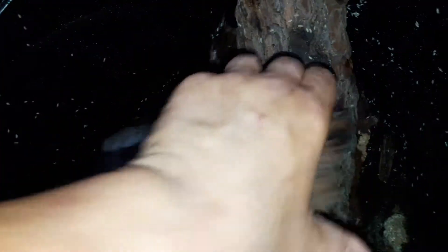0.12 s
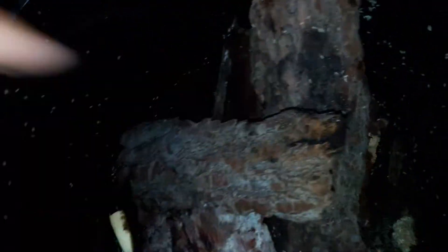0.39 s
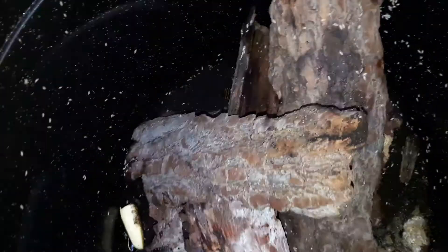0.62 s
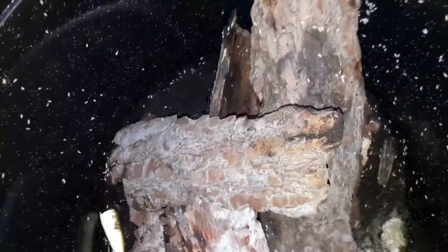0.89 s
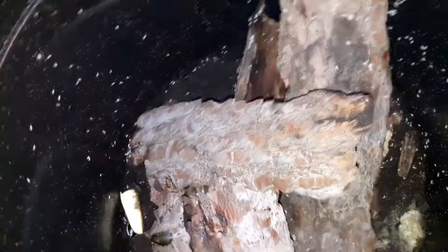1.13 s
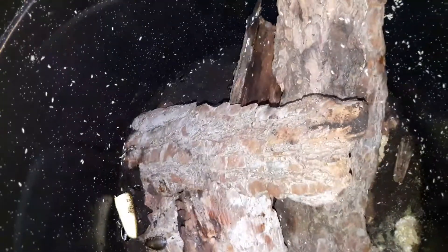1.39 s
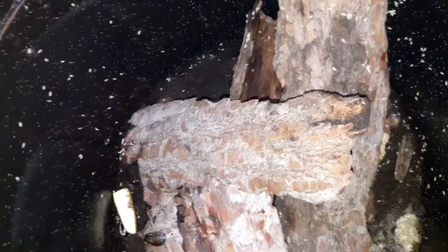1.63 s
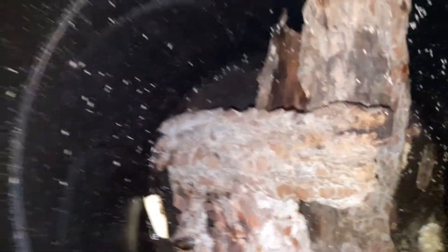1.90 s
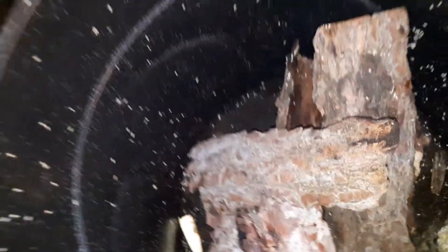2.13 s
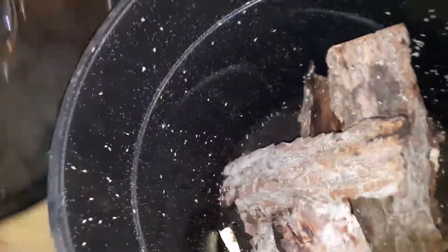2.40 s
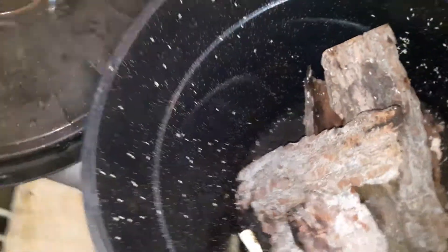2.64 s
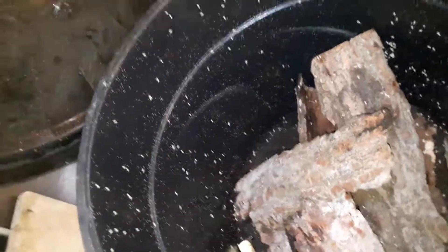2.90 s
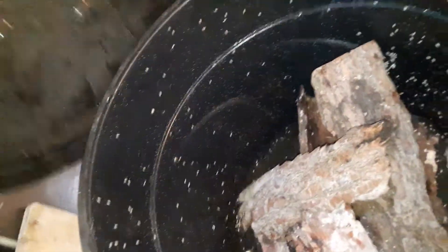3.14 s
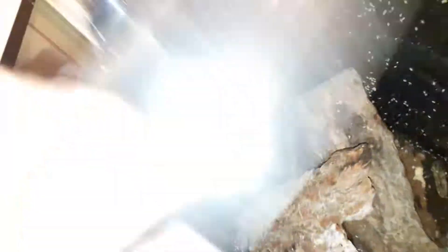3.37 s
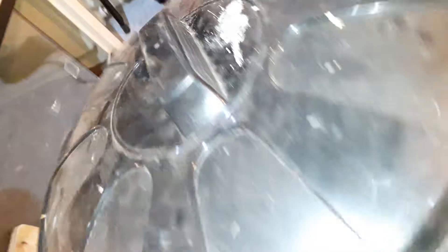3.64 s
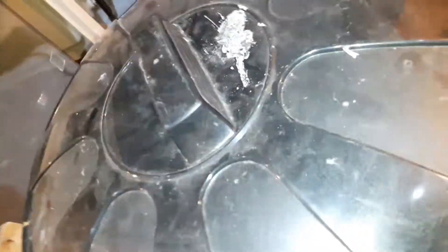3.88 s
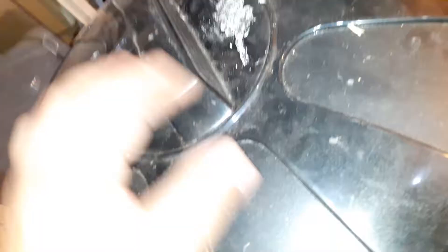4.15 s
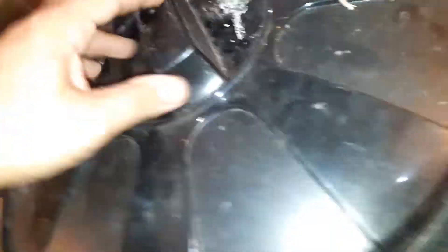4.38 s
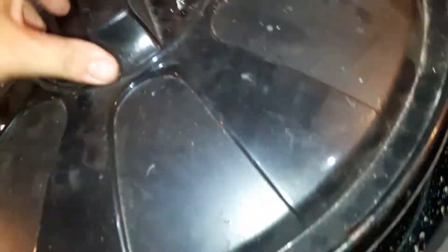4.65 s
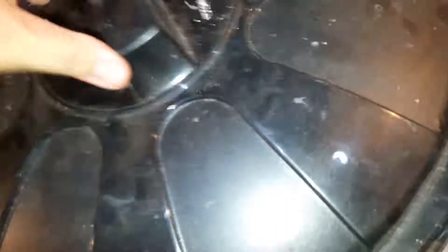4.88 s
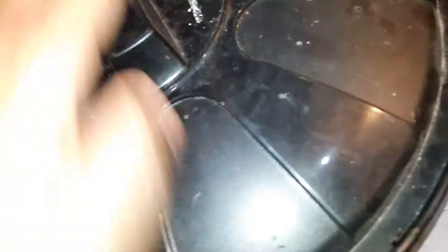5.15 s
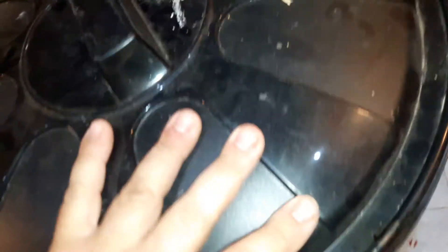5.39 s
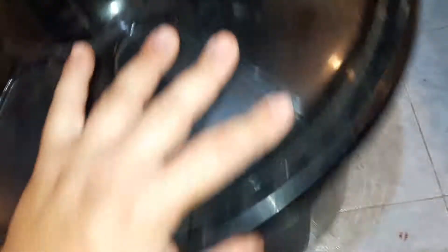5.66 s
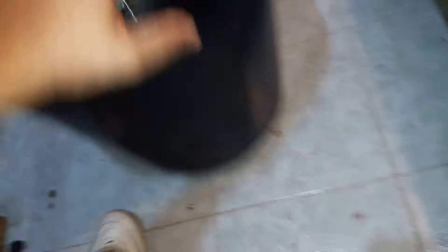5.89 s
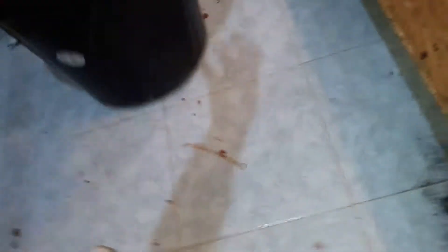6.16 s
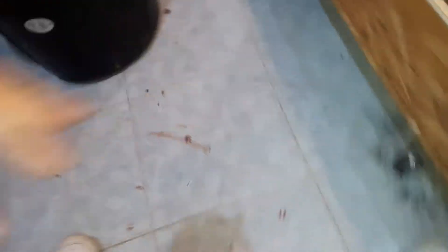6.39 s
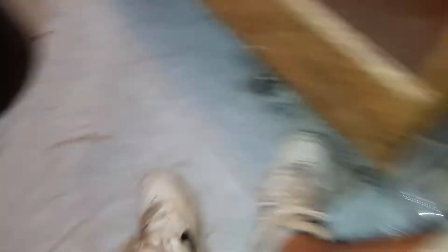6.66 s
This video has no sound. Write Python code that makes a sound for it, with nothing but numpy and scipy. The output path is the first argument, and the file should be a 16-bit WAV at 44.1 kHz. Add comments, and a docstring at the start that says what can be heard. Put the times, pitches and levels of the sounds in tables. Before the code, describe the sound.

A handheld microphone close to a large plastic bin indoors: brief dull bumps and dry crackling of wood, light handling, then a loud hollow knock as the lid goes on. More clacks and low thumps follow as it is seated, with a creaky rub, a last firm slap, and a rough, rattling scrape along the tiled floor. A short room echo follows each hit.

```python
"""Dull knocks, a rub and a dry crackle come first, as a hand leaves firewood in a plastic tub; it drops
the lid on, shifts and presses it home, then shoves the tub away over a tiled floor.
Blows and edge contacts excite damped modes of the tub's air, walls and rim. Friction noise sustains
modes in the strokes, squeaks and slide; random grains make the grit. A small hard room answers with
decaying noise, over a faint room tone."""
import sys
import numpy as np
from scipy import signal
from scipy.fft import rfft, irfft, next_fast_len
from scipy.io import wavfile

SR = 44100
rng = np.random.default_rng(int(sys.argv[2]) if len(sys.argv) > 2 else 0)


def log_audio(samples):
    """Write samples as a 16-bit WAV file to the path given in sys.argv[1]."""
    # one column per channel
    frames = np.atleast_2d(samples).T
    # limit to full scale, then quantise
    limited = np.clip(frames, -1, 1)
    pcm = np.round(limited * 32767).astype(np.int16)
    wavfile.write(sys.argv[1], SR, pcm)


def voltage_ratio(decibels):
    """Convert decibels (scalar or array-like) to amplitude ratios, 20 dB per decade."""
    exponent = np.asarray(decibels, float) / 20
    return 10 ** exponent


N = 298998

# tub modes: the enclosed air and walls boom, the stiff rim clacks
# columns: f/Hz, relative level/dB, T60/s of the free ring
BODY = [(94, 1.5, 0.15), (115, -1, 0.25), (144.2, 3.5, 0.16), (165, -9.5, 0.21), (190.2, 5.5, 0.096),
        (251.7, 6, 0.11), (301.1, 5, 0.099), (350, -2.5, 0.15)]
WALL = [(390, 1, 0.053), (456.5, -1, 0.088), (519, -6, 0.11), (569.4, -3, 0.056), (670, -20.5, 0.12)]
RIM = [(740, -8.5, 0.029), (884, -2, 0.0076), (896, -20.5, 0.058), (1062, -6, 0.042), (1186, -9.5, 0.05),
       (1273, 1.5, 0.021), (1484, 3, 0.016), (1664, -4, 0.015), (1950, 0.5, 0.027), (2390, 5, 0.17)]
# left-right likeness of reflections and broad sources: f/Hz, correlation/1
WIDE_LIKENESS = [(100, 1), (300, 0.93), (700, 0.64), (1500, 0.033), (10000, 0.022)]
LUCK_DB = 1.5   # standard deviation of mode levels from blow to blow
NEAR_PAN_DB = 0.5   # left minus right level of the handling before the ports colour it


def rms_one(x):
    """Normalisation: scales to unit root mean square."""
    return x / np.sqrt(np.mean(x ** 2) + 1e-20)


def in_time(rows):
    """Linear interpolation in time of columns in dB, practically silent before the first row."""
    s, *columns = np.transpose(rows)
    return [np.interp(np.arange(N) / SR, s, c, left=-200) for c in columns]


def at_hz(points, hz):
    """Linear interpolation of a table on a logarithmic frequency axis."""
    f, v = np.transpose(points)
    return np.interp(np.log(np.maximum(hz, 1)), np.log(f), v)


def coloured(x, gain):
    """Linear filtering: multiplies the spectrum by gain(Hz)."""
    size = next_fast_len(x.shape[-1])
    spectrum = rfft(x, size) * gain(np.fft.rfftfreq(size, 1 / SR))
    return irfft(spectrum, size)[..., :x.shape[-1]]


def coarse_and_fine(x, spectrum):
    """Spectral shaping, then a split at 6800 Hz into two parts of unit rms each."""
    x = coloured(x, lambda hz: voltage_ratio(at_hz(spectrum, hz)))
    coarse = coloured(x, lambda hz: hz < 6800)
    return rms_one(coarse), rms_one(x - coarse)


def drift(rate):
    """Slow random fluctuation of unit rms: white noise through two equal low-pass poles at rate/Hz."""
    r = np.exp(-2 * np.pi * rate / SR)
    slow = signal.lfilter([1], [1, -2 * r, r * r], rng.standard_normal(N + SR))
    return rms_one(slow[SR:])   # the filter settles in the first second


def ring(force, hz, t60):
    """Damped resonator: a unit click sets off a decaying sine of initial height 1."""
    r, w = voltage_ratio(-60 / (t60 * SR)), 2 * np.pi * hz / SR
    return signal.lfilter([0, np.sin(w)], [1, -2 * r * np.cos(w), r * r], force + 1e-18)


def dying(clicks, t60):
    """First-order relaxation: each click starts an exponential decay."""
    return signal.lfilter([1], [1, -voltage_ratio(-60 / (t60 * SR))], clicks + 1e-18)


def spikes(seconds, db):
    """Impulse train: one click per event."""
    clicks = np.zeros(N)
    clicks[(seconds * SR).astype(int)] = voltage_ratio(db)
    return clicks


def paired(mid, side, likeness):
    """Interchannel correlation: mixes two unrelated signals to the likeness in the table."""
    alike = lambda hz: np.clip(at_hz(likeness, hz), 0, 1)
    mid = coloured(mid, lambda hz: np.sqrt(1 + alike(hz)))
    side = coloured(side, lambda hz: np.sqrt(1 - alike(hz)))
    return np.array([mid + side, mid - side]) / np.sqrt(2)


def wide_noise(likeness):
    """White noise in stereo with a frequency-dependent correlation."""
    return paired(*rng.standard_normal((2, N)), likeness)


def rubbed(modes, rough_db, rate, favoured=None):
    """Friction excitation: uneven noise keeps modes ringing, most of all near the favoured pitch."""
    force, out = rng.standard_normal(N) * voltage_ratio(rough_db * drift(rate)), 0
    for hz, level_db, t60 in modes:
        # 5 dB lost per octave away from the favoured pitch
        near = 1 if favoured is None else voltage_ratio(-5 * np.abs(np.log2(hz / favoured)))
        # noise builds up more in a long ring; sqrt(t60) evens that out
        out = out + near * voltage_ratio(level_db) * ring(force, hz, t60) / np.sqrt(t60)
    return rms_one(out)


def luck(rows, modes, reach_db):
    """Modal participation in dB: the spot hit favours one mode, others lose reach_db per octave."""
    s, db, favoured = np.transpose(rows)[:3, :, None]
    hz, level_db, t60 = np.transpose(modes)
    loss = reach_db * np.abs(np.log2(hz / favoured))
    return db + level_db - loss + rng.normal(0, LUCK_DB, (len(s), len(hz)))


def placed(x, pan_db, lead_s):
    """Interaural-style cues: the left port hears the source louder by pan and earlier by lead."""
    way = np.array([[.5], [-.5]])
    return voltage_ratio(way * pan_db) * coloured(x, lambda hz: np.exp(2j * np.pi * way * hz * lead_s))


def room_tone():
    """Stationary coloured noise: a faint hush with a slowly wavering level."""
    # spectrum of the hush: f/Hz, relative level/dB per Hz
    hush = [(15, -48), (25, 7), (107, 1), (144, 3), (248, -2.5), (299, -8), (500, -2.5), (620, -9),
            (1010, -6.5), (1150, -8.5), (1510, -6.5), (1680, -7), (2330, -9), (5230, -17.5), (15800, -24)]
    # left-right likeness: f/Hz, correlation/1
    hush_likeness = [(60, 0.91), (240, 0.61), (950, 0.42), (3770, -1.1), (15000, -0.04)]
    air = coloured(wide_noise(hush_likeness), lambda hz: voltage_ratio(at_hz(hush, hz)))
    return voltage_ratio(-61 + 1.0 * drift(3)) * rms_one(air)


def room(x):
    """Diffuse reverberation: each sixth-octave's energy dies away as fresh noise.

    Source and ports keep moving, so reflections never repeat."""
    # reverberation time: f/Hz, T60/s
    room_t60 = [(100, 0.24), (400, 0.3), (1500, 0.27), (5000, 0.24), (14000, 0.31)]
    # reflections against the direct sound: f/Hz, level/dB
    room_level = [(100, -12.5), (300, -6.5), (1000, -3.5), (4000, -2.5), (12000, -7.5)]
    noise = [wide_noise(WIDE_LIKENESS) for _ in "ab"]   # neighbouring bands draw on different noise
    build = np.exp(-1 / (0.0011 * SR))   # reflections build up with a time constant of 1.1 ms
    out = 0
    for k, low in enumerate(70 * 2 ** (np.arange(47) / 6)):
        band = signal.butter(2, [low, low * 2 ** (1 / 6)], "band", fs=SR, output="sos")
        half = at_hz(room_t60, low) / 2   # the square root taken below doubles the decay time
        energy = dying(signal.sosfilt(band, x) ** 2, half) * (1 - voltage_ratio(-60 / (half * SR)))
        energy = signal.lfilter([1 - build], [1, -build], energy)
        tail = np.sqrt(energy) * rms_one(signal.sosfilt(band, noise[k % 2]))
        out = out + voltage_ratio(at_hz(room_level, low)) * tail
    return out


def squeak():
    """Friction-sustained resonance: a slipping finger keeps a single mode singing."""
    # faint squeaks under the sliding hand: start t/s, length/s, level/dB, f/Hz, T60/s
    squeaks = [(3.04, .11, -54, 1190, .05), (3.07, .13, -70, 8700, .012)]
    t, out = np.arange(N) / SR, 0
    for s, length, db, hz, t60 in squeaks:
        swell = np.interp(t, [s, s + length / 2, s + length], [0, 1, 0])
        out = out + voltage_ratio(db) * swell * rubbed([(hz, 0, t60)], 2.5, 30)
    return out


def rubs():
    """Friction: pressing wobbles the body, chafing excites walls and rim, skin hisses."""
    # strokes of hand and lid on the tub: start t/s, length/s,
    # pressure on the walls level/dB, rim chafe level/dB, skin hiss level/dB
    strokes = [(-0.07, 0.12, -51, -37.5, -49.5), (0.167, 0.048, -67, -62, -58.5),
               (0.31, 0.66, -68, -68, -66.5), (1.038, 0.087, -75, -62, -66), (1.414, 0.11, -61, -52.5, -64),
               (1.547, 0.08, -56, -53.5, -82), (1.657, 0.3, -59.5, -68.5, -72),
               (1.92, 0.26, -75, -61.5, -65), (2.12, 1, -90, -72, -61.5), (3.048, 0.074, -48, -51.5, -93),
               (3.197, 0.088, -70, -55, -87), (3.4, 0.13, -52, -55, -66), (3.496, 0.099, -63, -55.5, -53.5),
               (3.57, 0.28, -62, -48, -57), (3.796, 0.22, -40.5, -54, -58.5),
               (3.942, 0.087, -32, -41, -47.5), (4.004, .12, -54, -48.5, -59),
               (4.143, 0.1, -52.5, -68, -64.5), (4.372, 0.16, -48, -47, -50.5),
               (4.601, 0.25, -55, -59, -57), (4.884, 0.27, -40, -42.5, -47), (4.998, 0.096, -19, -59, -47),
               (5.084, 0.13, -18.5, -31, -47), (5.265, 0.14, -56, -60.5, -60),
               (5.374, 0.12, -66, -54.5, -56.5), (5.445, 0.4, -66, -51, -55.5)]
    # spectrum of skin hiss: f/Hz, relative level/dB per Hz
    skin_spectrum = [(880, -19), (1500, -4.5), (2670, -1.5), (2970, -2.5), (5090, -4), (7090, -9.5),
                     (8540, -12), (9510, -15), (11900, -14.5), (15500, -27)]
    rise = 0.26   # share of a stroke spent rising
    t, gains = np.arange(N) / SR, 0
    for s, length, *db in strokes:
        shape = np.interp((t - s) / length, [0, rise, 1], [0, 1, 0]) ** 0.5
        gains = gains + voltage_ratio(np.array(db))[:, None] * shape
    press, chafe, hiss = gains
    favoured = 720 * 2 ** (0.22 * drift(9.9))   # Hz, roaming by 0.22 octave rms
    skin = wide_noise(WIDE_LIKENESS) * voltage_ratio(1.7 * drift(40))
    skin = rms_one(coloured(skin, lambda hz: voltage_ratio(at_hz(skin_spectrum, hz))))
    wobble = press * rubbed(BODY[1:4], 1.3, 19.0)
    return wobble + chafe * rubbed(WALL + RIM, 3.5, 23, favoured) + hiss * skin


def drag():
    """Granular friction: grit is crushed in clumps under the wide base, while the walls rumble along."""
    # tub base sliding on tiles: t/s, grit level/dB, treble level against the grit/dB
    slide = [(5.56, -72, 8), (5.6, -55, 0), (5.63, -41, -5.5), (5.68, -36, -5), (5.95, -26.5, -5.5),
             (6.0, -25.5, -4.5), (6.1, -27, -6.5), (6.14, -27, -2.5), (6.22, -25, -2), (6.32, -27, 0.5),
             (6.41, -29.5, -4), (6.49, -36.5, -11), (6.6, -53.5, -11.5), (6.69, -51.5, -6.5),
             (6.78, -60, -7)]
    # the base catches on tile joints: t/s, base chatter level/dB, jolt of the grit level/dB
    catches = [(5.658, -55, 2.5), (5.989, -37, 2), (6.148, -29.5, 3.5), (6.236, -29, -2.5),
               (6.331, -21.5, -1), (6.417, -49, -1)]
    # base edge modes: f/Hz, relative level/dB, T60/s
    base_modes = [(1950, -1, 0.054), (2330, -8, 0.013), (2510, 4, 0.05), (2692, 9.5, 0.043),
                  (3530, 8.5, 0.0048)]
    # spectrum of the grit: f/Hz, relative level/dB per Hz
    grit_spectrum = [(240, 4.5), (400, -1.5), (561, -4), (799, 0.5), (1070, -2.5), (1170, -1), (1890, -0.5),
                     (2690, -2), (4080, -4.5), (5300, -2), (6470, -5.5), (8030, -12.5), (9960, -14),
                     (11800, -14.5), (15800, -24.5)]
    rumble_db, steady_chatter_db = -5, -11.5   # against the grit
    grains_per_s, grain_spread_db = 5000, 1   # the rate is nominal, as clumping varies it
    chatter_rough_db, catch_t60_s = 4.0, 0.34
    grit_db, treble_db = in_time(slide)
    s, chatter_db, jolt_db = np.transpose(catches)
    jolts = dying(spikes(s, jolt_db) - spikes(s, 0), catch_t60_s)
    coarse = voltage_ratio(grit_db) * (1 + jolts)
    rumble, fine = coarse * voltage_ratio(rumble_db), coarse * voltage_ratio(treble_db)
    chatter = voltage_ratio(grit_db + steady_chatter_db) + dying(spikes(s, chatter_db), catch_t60_s)
    born = rng.random((2, N)) < grains_per_s * voltage_ratio(3.0 * drift(30)) / SR
    sizes = voltage_ratio(grain_spread_db * np.minimum(rng.exponential(1, (2, N)), 5))
    grains = born * sizes * rng.choice([-1, 1], (2, N))
    low, high = coarse_and_fine(paired(*grains, WIDE_LIKENESS), grit_spectrum)
    edge = paired(rubbed(base_modes, chatter_rough_db, 32),
                  rubbed(base_modes, chatter_rough_db, 35), WIDE_LIKENESS)
    return rumble * rubbed(BODY[2:], 3.0, 16) + coarse * low + fine * high + chatter * edge


def taps():
    """Impulse response of the rim: edges clack on it with a noisy crack; bark crumbles in brief puffs."""
    # hard edge contacts: t/s, rim level/dB, favoured mode f/Hz, crack level/dB, fine crack level/dB
    contacts = [(0.171, -49, 1480, -55, -52), (0.258, -25, 725, -53, -62), (0.282, -34.5, 1050, -60, -70),
                (0.308, -27, 740, -57, -70), (0.414, -41, 727, -54.5, -78), (1.05, -43, 860, -72, -66),
                (1.434, -28.5, 740, -59, -73), (1.45, -44, 795, -69, -66), (1.559, -45.5, 1060, -53, -75),
                (1.912, -40, 804, -64, -65), (2.782, -11.5, 1365, -28.5, -55), (2.885, -14, 1180, -27, -44),
                (2.963, -28.5, 1110, -62, -73), (3.009, -41, 1070, -65, -97),
                (3.315, -21.5, 1220, -29.5, -41.5), (3.357, -19.5, 1050, -42.5, -70),
                (3.549, -24, 1015, -33.5, -54), (3.649, -32, 1070, -53, -72), (3.664, -34, 1060, -51, -70),
                (3.769, -23, 1340, -38.5, -70), (3.972, -28.5, 1160, -35, -44), (4.1, -45, 1380, -45, -59),
                (4.633, -53, 1550, -57, -60), (4.908, -38, 755, -48, -70), (4.949, -30.5, 1490, -41, -62),
                (5.009, -25, 1000, -24.5, -40), (5.056, -10.5, 890, -33, -47),
                (5.117, -14, 950, -34.5, -48), (5.137, -23, 740, -50, -45), (5.151, -3.5, 820, -38, -50),
                (5.385, -31, 712, -65, -64), (5.438, -11.5, 795, -33.5, -65),
                (5.485, -37.5, 1080, -60, -65), (5.659, -47, 2020, -32, -31.5), (5.714, -32, 706, -41, -32),
                (6.17, -18, 1950, -20, -41), (6.331, -16, 1950, -14.5, -25), (6.42, -38, 2080, -22, -23)]
    # bark and grit crumble under the log, later under the lid's edge:
    # t/s at the loudest, crack level/dB, fine crack level/dB
    crumbles = [(0.249, -50, -43), (0.259, -33.5, -40), (0.282, -44, -46), (0.31, -50, -64),
                (0.331, -43, -45), (0.352, -65, -43), (3.97, -26.5, -47.5), (5.444, -33, -36),
                (5.486, -42, -43.5)]
    # spectrum of cracks: f/Hz, relative level/dB per Hz
    crack_spectrum = [(1060, -26), (1800, -2), (2800, -2), (4240, -8), (5260, -8.5), (6770, -17),
                      (7960, -21), (9620, -25), (11100, -22), (15500, -40)]
    crumble_s, bite_s, crack_t60_s = 0.0026, 0.00033, 0.02   # crumble: half width to 1/e
    s, *_, coarse_db, fine_db = np.transpose(contacts)
    mode_levels = luck(contacts, RIM, 34.5).T
    out = sum(ring(spikes(s, db), hz, t60) for (hz, _, t60), db in zip(RIM, mode_levels))
    bite = np.exp(-1 / (bite_s * SR))
    t = np.arange(-SR // 20, SR // 20 + 1) / SR
    puff = np.exp(-(t / crumble_s) ** 2)
    puff_s, *puff_levels = np.transpose(crumbles)
    noises = coarse_and_fine(wide_noise(WIDE_LIKENESS), crack_spectrum)
    for db, puff_db, noise in zip((coarse_db, fine_db), puff_levels, noises):
        # the edge bites and rebounds
        clicks = signal.lfilter([2 * (1 - bite)], [1, -bite], spikes(s, db) + 1e-18)
        puffs = np.abs(signal.fftconvolve(spikes(puff_s, puff_db), puff, "same"))
        out = out + noise * (dying(clicks, crack_t60_s) + puffs)
    return out


def thumps():
    """Modal superposition: each mode swells over part of its cycle; the hand shortens the ring."""
    # soft heavy blows: t/s, body level/dB, favoured mode f/Hz, upper wall level/dB
    blows = [(0.242, -16, 177, -22), (0.262, -39, 208, -36), (0.305, -21, 180, -29.5),
             (0.414, -38, 170, -45), (1.056, -47, 172, -53), (1.505, -60, 398, -40), (1.571, -45, 145, -63),
             (1.639, -33, 80.7, -48), (1.856, -43, 132, -63), (1.915, -33, 402, -36.5),
             (1.927, -27, 94, -53), (1.992, -31.5, 94.2, -47), (2.404, -50, 145, -50.5),
             (2.78, -7.5, 188, -14.5), (2.884, -17, 330, -17.5), (3.088, -39, 198, -39),
             (3.314, -20, 93, -24.5), (3.358, -24, 94, -26), (3.547, -20, 162, -29.5),
             (3.667, -20.5, 155, -53), (3.773, -13.5, 145, -31), (3.97, -8, 117, -22),
             (3.977, -4, 126.5, -41), (4.373, -25.5, 131, -46.5), (4.412, -27.5, 122, -36),
             (4.439, -29, 129, -60), (4.459, -20, 129, -60), (4.483, -22, 129, -62),
             (4.632, -24, 116, -40.5), (4.776, -28, 115, -54), (4.829, -32, 127, -47),
             (4.946, -15.5, 121, -51), (4.968, -21.5, 227, -31), (5.004, -9, 164, -18),
             (5.052, -4.5, 220, -14.5), (5.118, -3.5, 130, -10), (5.138, -2, 216, -10),
             (5.152, -12, 165, -8.5), (5.198, -22, 302, -33), (5.432, -3.5, 123, -36),
             (5.437, -9, 243, -15.5), (5.474, -22, 127, -45), (5.966, -14, 238, -23),
             (6.207, -10, 173, -47), (6.694, -37, 158, -46)]
    swell_cycles, ring_share = 0.64, 0.63   # time constant of the swell; share of the free T60 left
    out, t = np.zeros(N + SR), np.arange(SR // 2) / SR
    hz, _, t60 = np.transpose(BODY + WALL)[:, :, None]
    walls = np.array(WALL)[:, 1] + rng.normal(0, LUCK_DB, (len(blows), len(WALL)))
    levels = np.hstack([luck(blows, BODY, 18), np.array(blows)[:, 3:4] + walls])
    swell = 1 - np.exp(-t * hz / swell_cycles)
    rings = swell ** 2 * voltage_ratio(-60 * t / (t60 * ring_share)) * np.sin(2 * np.pi * hz * t)
    for (s, *_), db in zip(blows, levels):
        start = int(s * SR)
        out[start:start + len(t)] += voltage_ratio(db) @ rings
    return out[:N]


def scene():
    """Superposition of direct sound, reflections and room tone."""
    near, far = thumps() + taps() + rubs() + squeak(), drag()
    air = room_tone()
    # handling arrives first at the left port, the slide first at the right
    direct = placed(near, NEAR_PAN_DB, 0.00016) + placed(far, 0.5, -0.00011)
    return direct + room((near + far)[0]) + air


def low_pass(x):
    """Removes everything above the highest recorded frequency."""
    return signal.sosfilt(signal.butter(12, 16830, fs=SR, output="sos"), x)


def record(dry):
    """Linear filtering by two ports of unlike colour, a bass cut and a treble cut."""
    # port resonances: f/Hz, gain/dB
    port_gain = [(4200, -0.5), (5500, 4), (6100, -1.5), (6900, -6), (8200, 2.5), (10000, -2.5),
                 (11800, 1.5)]
    # left minus right for the handling, its pan included: f/Hz, level difference/dB
    port_difference = [(60, 3.5), (120, 3), (240, 4), (480, 4.5), (950, 5), (1890, 1.5), (3770, -3.5),
                       (7520, -4), (15000, 7)]
    way = np.array([[.5], [-.5]])
    mix = coloured(dry, lambda hz: voltage_ratio(at_hz(port_gain, hz)
                                       + (at_hz(port_difference, hz) - NEAR_PAN_DB) * way))
    mix = signal.sosfilt(signal.butter(2, 113, "high", fs=SR, output="sos"), mix)
    mix = signal.sosfilt(signal.cheby2(16, 60, 16300, fs=SR, output="sos"), mix)
    return low_pass(mix)


dry = scene()
out = record(dry)
log_audio(out)
```